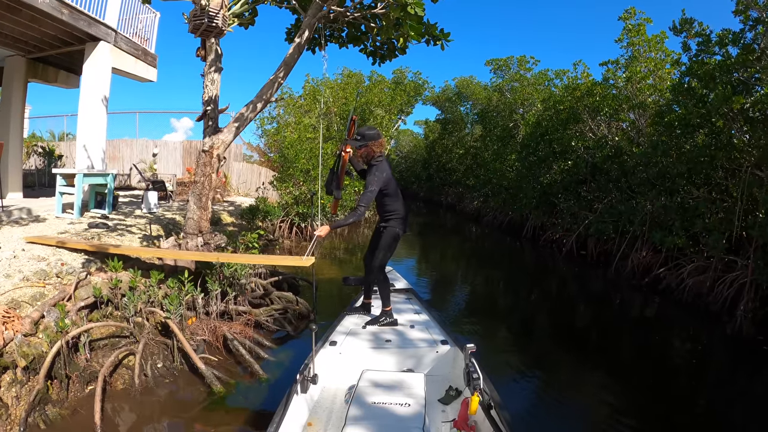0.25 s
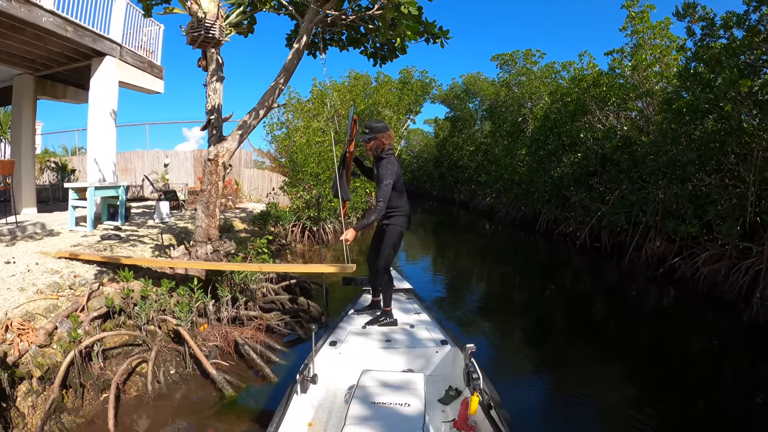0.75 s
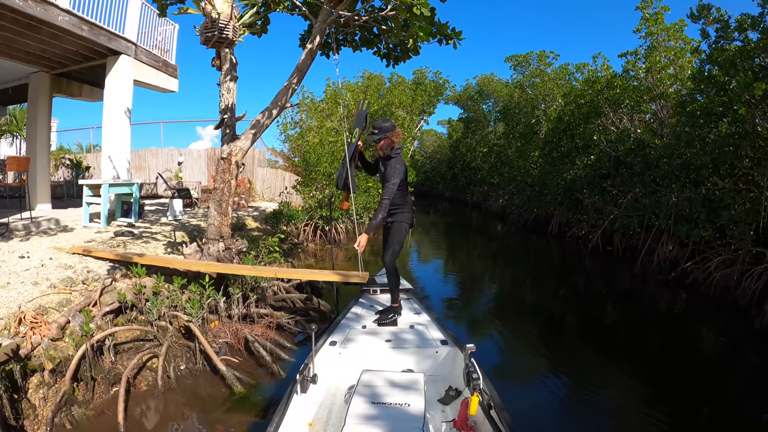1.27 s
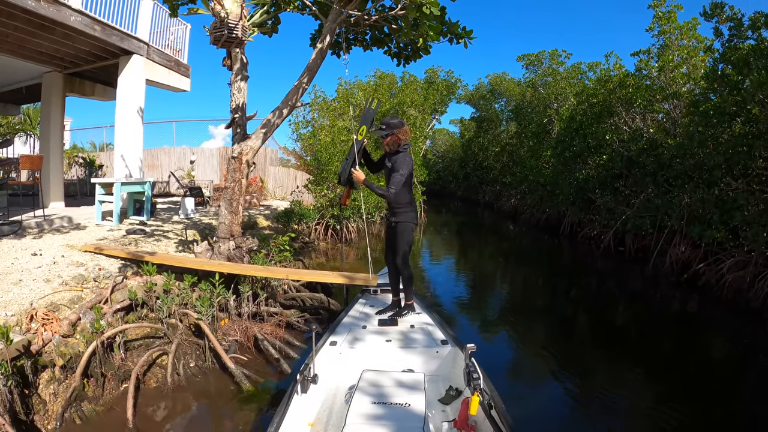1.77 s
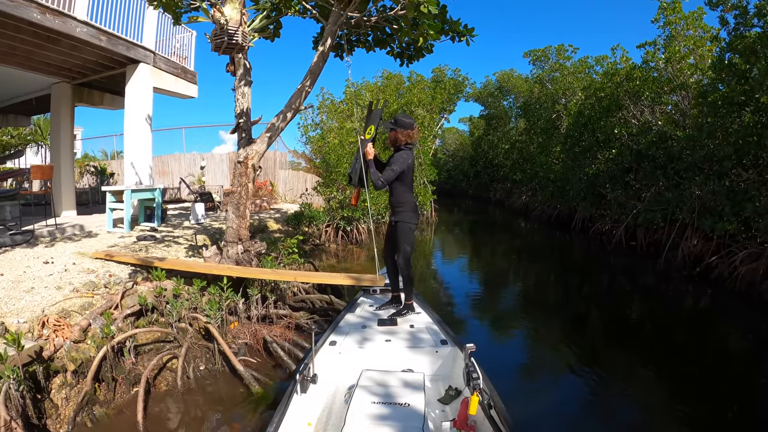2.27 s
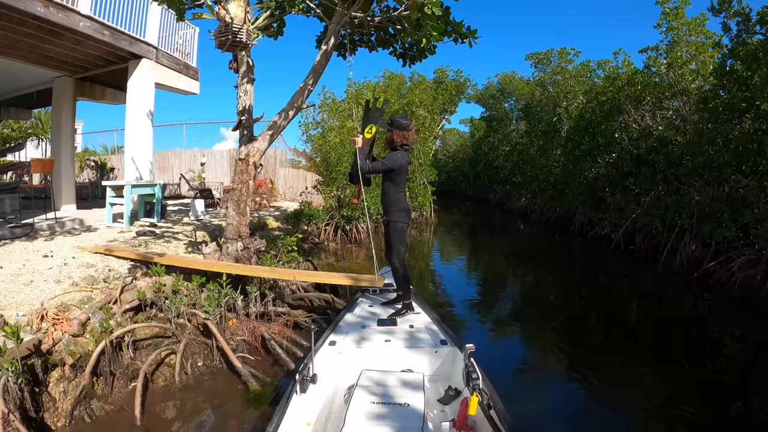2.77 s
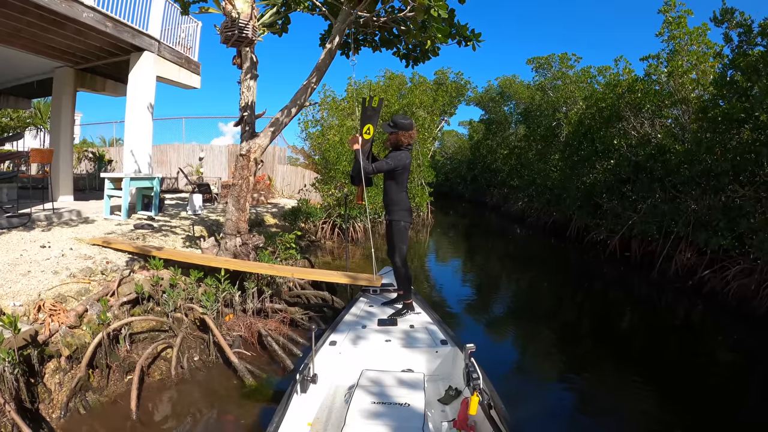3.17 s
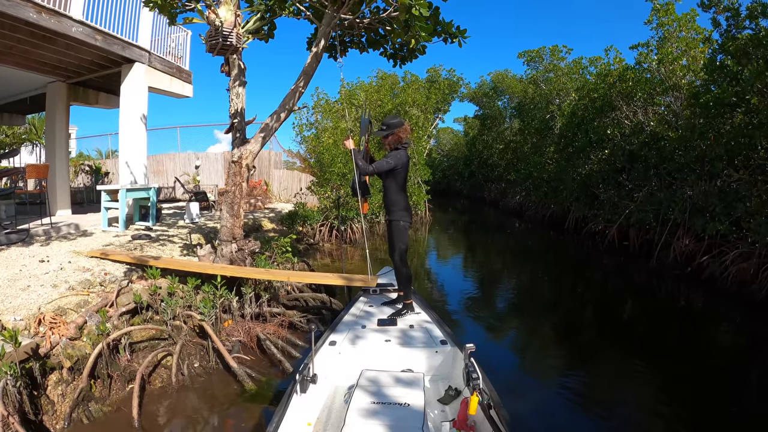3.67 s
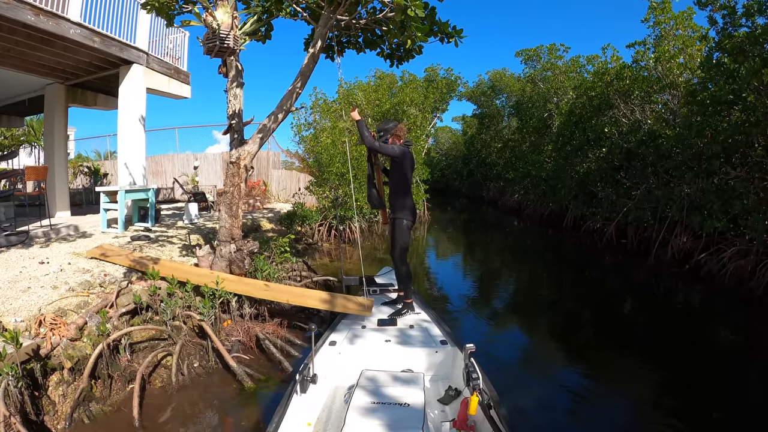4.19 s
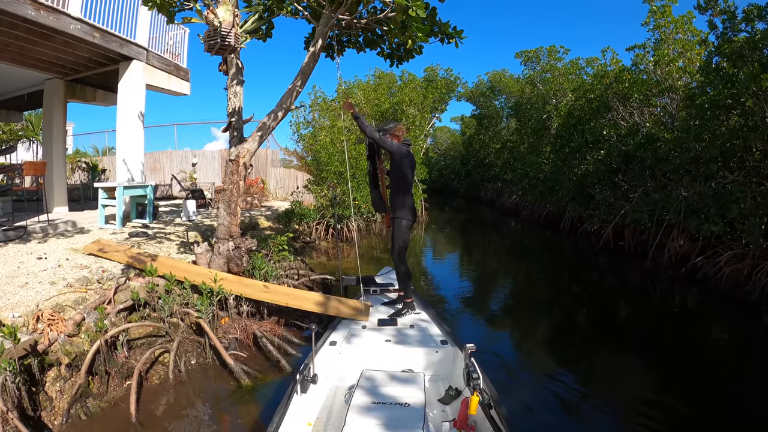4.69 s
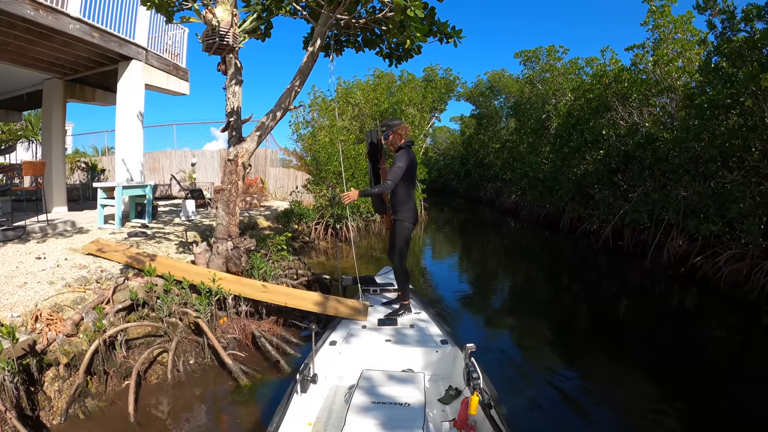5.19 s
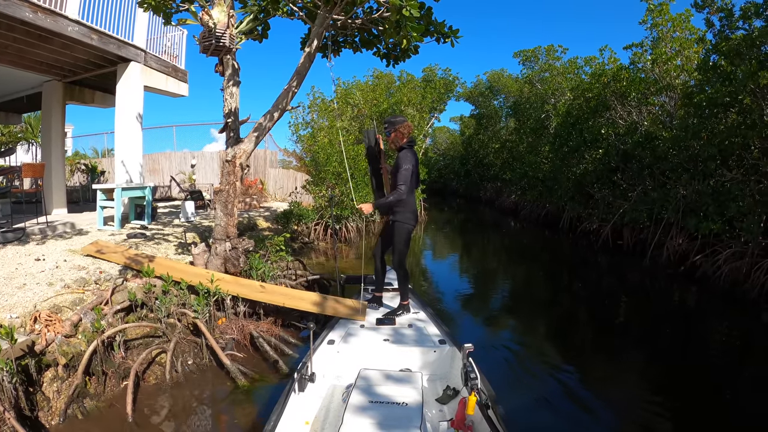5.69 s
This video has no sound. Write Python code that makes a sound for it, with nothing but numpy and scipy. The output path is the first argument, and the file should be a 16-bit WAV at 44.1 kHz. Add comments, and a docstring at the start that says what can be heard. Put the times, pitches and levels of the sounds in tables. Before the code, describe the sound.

Jerky wooden scraping gives way to knocks, ticking gear and booming thumps on a small boat's hollow hull, with faint rustling.

```python
"""Boarding plank on a small boat

A person handles a boarding plank on a hollow boat by a canal bank, heard from the hull.
A wooden plank scrapes over an edge in stick-slip jerks, and later the wood knocks. Feet and plank thump
the deck and set the hull booming. Gear ticks, cloth and line rustle, and a lumpy low rumble runs below."""
import sys
import numpy as np
from scipy import signal
from scipy.io import wavfile

SR = 44100
rng = np.random.default_rng(int(sys.argv[2]) if len(sys.argv) > 2 else 0)


def pcm_store(signal):
    """Save signal as 16-bit PCM."""
    levels = np.round(np.clip(np.atleast_2d(signal), -1, 1) * 32767)
    wavfile.write(sys.argv[1], SR, levels.astype(np.int16).T)


N = 261954


def plank_scrape():
    """Stick-slip clicks ring the wood's modes and throw off grit; catches and a knock strike them hard."""
    # pressure of the stroke over the edge: t/s, level/dB
    scrape = [(0.0, -39), (0.1, -64), (0.22, -40), (0.53, -31.5), (0.64, -36), (0.73, -49.5), (0.79, -45.5),
              (1.0, -50), (1.12, -77)]
    # sharp catches during the drag: t/s, level/dB, treble tilt/(dB/octave)
    catches = [(0.153, -35, -5), (0.212, -36.5, 6.5), (0.221, -26, 1.5), (0.236, -16.5, -1.5),
               (0.274, -22, -1.5), (0.332, -31, 3), (0.362, -16.5, -1), (0.384, -15, 0.5),
               (0.403, -19, -4.5), (0.483, -37, 3), (0.5, -36, -1), (0.564, -22, -4.5), (0.588, -13, -0.5),
               (0.636, -26, -6), (0.793, -27.5, -0.5), (0.807, -18, -3.5), (0.914, -41, 2.5)]
    # the later wooden knock: t/s, level/dB, treble tilt/(dB/octave)
    drop = [(2.107, -27, 0)]
    # the wood's modes: f/Hz, knocked level/dB, dragged level/dB
    modes = [(139.5, -12, -20), (228.4, -4, -23), (384, -3.5, -12.5), (433.7, -9.5, -6.5), (536, -9, -6),
             (574.4, 1.5, -17.5), (594, -41, -5), (670, -22, -4), (735, -14, -11), (763, -7, -17),
             (866, -15, -8.5), (933, -19, -8.5), (1031, -11, -6), (1256, -25, -16.5), (1370, -9.5, -20.5),
             (1479, -29, -9.5), (1735, -13.5, -2.5), (1942, -15.5, -7.5), (3235, -28, -13)]
    # spectrum of the grit: f/Hz, level/dB
    grit_spectrum = [(250, -7.5), (430, -16.5), (1000, 0), (3300, -11), (9600, -40.5), (14500, -46.5)]
    _, catch_db, catch_tilt_db = np.transpose(catches)
    jerky = from_db(1.5 * drift(35))
    drag = from_db(in_time(scrape)[0]) * jerky * (np.arange(N) < scrape[-1][0] * SR)
    stroke = drag + bursts(catches, from_db(catch_db - 6), t60=0.064)
    slips = grains(per_s=450, spread_db=4.5) * stroke
    body = sum(from_db(db) * ring(slips[k % 2, k // 2 % 2], hz, decay_s(hz, 0.16))
               for k, (hz, _, db) in enumerate(modes))
    body += from_db(-4.5) * ring(slips[0, 0], hz=105, t60=0.064)   # the hull groans along
    bright_db = bursts(catches, catch_tilt_db, t60=0.18)
    grit = stroke * coloured(grains(per_s=1800, spread_db=1.3), grit_spectrum, low_hz=260, bands=12,
                             patchy_db=1, flicker_hz=29.2, tilt_db=bright_db)
    knocked, dragged = np.array(modes)[:, :2], np.array(modes)[:, ::2]
    knocks = strike(drop, knocked, gain_db=-3.5, uneven_db=2, travel_s=0.0048, t60=0.32)
    knocks += strike(catches, dragged, gain_db=-10, uneven_db=5, travel_s=0.002, t60=0.12)
    pan_left = from_db([[1.2], [-1.2]])
    return (from_db(-19) * body + knocks + from_db(-8) * grit) * pan_left


def deck_thumps():
    """The hull booms, pushed down first, and loose boards and gear shake briefly after each thump."""
    # feet, weight and the plank's end landing: t/s, level/dB, treble tilt/(dB/octave)
    thumps = [(2.315, -42, 17), (2.551, -40.5, -12), (2.811, -33, 10.5), (3.193, -33, 0),
              (4.056, -26.5, 5.5), (4.499, -8, 0), (4.595, -10.5, 0), (4.605, -32, 13), (4.652, -22, -6.5),
              (4.746, -28, 4), (5.426, -26, -1.5), (5.525, -49, 14)]
    # modes of the hollow hull: f/Hz, level/dB
    hull_modes = [(59, -4.5), (85, -7.5), (118, -5.5), (175, -3.5), (235, -14), (310, -17), (400, -18.5),
                  (458, -14), (680, -31.5)]
    boom = -strike(thumps, hull_modes, gain_db=-13, uneven_db=1.8, travel_s=0.00125, t60=0.2,
                   loss=0.42, lean_db=.7, dispersion=1, swell=.02)
    contacts = grains(per_s=1500, spread_db=2.5)[0, 0]
    rattle = rms_one(signal.sosfilt(signal.butter(2, [400, 1200], "band", fs=SR, output="sos"), contacts))
    shake = bursts(thumps, from_db(np.array(thumps)[:, 1] - 39), t60=0.17)
    return boom + rattle * shake


def gear_taps():
    """Each tap is a crack, a very short tone and a gritty rattle dying away around that pitch."""
    # small ticks and taps: t/s, level/dB, f/Hz, rattle t60/s
    taps = [(1.178, -51, 4540, 0.039), (1.221, -46, 1690, 0.095), (1.274, -50, 2830, 0.044),
            (1.577, -41, 1630, 0.07), (1.697, -47, 2700, 0.0077), (1.7404, -47, 920, 0.17),
            (2.106, -29.5, 1200, 0.16), (2.1835, -37, 2650, 0.22), (2.2018, -32.5, 1540, 0.23),
            (2.2518, -31.5, 2700, 0.03), (2.316, -35, 1500, 0.23), (2.383, -39, 3120, 0.06),
            (2.4583, -33, 1560, 0.067), (2.8136, -44, 3010, 0.12), (3.759, -53.5, 1620, 0.099),
            (3.956, -42.5, 2980, 0.043), (4.331, -47.5, 1730, 0.071), (4.497, -28, 1007, 0.097),
            (4.591, -39.5, 1020, 0.068), (5.413, -55, 1296, 0.05), (5.427, -34, 1796, 0.085),
            (5.6352, -56, 2060, 0.12), (5.728, -56.5, 1650, 0.47), (5.877, -59, 1300, 0.12),
            (5.9054, -28.5, 2400, 0.084)]
    size = 8192
    out, t = np.zeros((2, N + size)), np.arange(size) / SR
    attack = np.minimum(t / .0008, 1)
    crack_lowpass = signal.butter(2, 9000, fs=SR, output="sos")
    rattle_lowpass = signal.butter(2, 7000, fs=SR, output="sos")
    for s, level_db, hz, t60 in taps:
        grit = rng.standard_normal((2, size)) * from_db(4 * rng.standard_normal(size))
        grit = grit[0] + .2 * grit[1] * [[1], [-1]]   # narrow stereo
        band = signal.butter(1, [hz * 0.43, min(hz * 2.26, .4 * SR)], "band", fs=SR, output="sos")
        rattle = rms_one(signal.sosfilt(np.vstack([band, band, rattle_lowpass]), grit))
        rattle *= from_db(-9.5 - 60 * t / t60)
        crack = rms_one(signal.sosfilt(crack_lowpass, grit)) * from_db(-19 - 60 * t / .015)
        tone = np.sin(2 * np.pi * hz * t) * from_db(-6 - 60 * t / .03)
        at = round(s * SR)
        out[:, at:at + size] += from_db(level_db) * (rattle + crack + tone) * attack
    return out[:, :N]


def rustle():
    """Cloth rubs in fine grains and line rasps over an edge; moves swell and fade over a faint hiss."""
    # moves of cloth and line: t/s at full level, hold/s, level/dB, treble tilt/(dB/octave)
    moves = [(1.009, 0.02, -62, 2), (1.176, 0.17, -71, 2.5), (1.454, 0.051, -66.5, 5.5),
             (1.537, 0.058, -67, 0.5), (1.73, 0.034, -68, 0), (2.168, 0.31, -64.5, 2),
             (2.75, 0.078, -70, 3.5), (2.959, 0.064, -73.5, 5.5), (3.458, 0.19, -74.5, 2),
             (3.815, .05, -71.5, 1), (3.892, 0.076, -60, 1), (4.066, 0.066, -62.5, 1.8),
             (4.147, 0.47, -63.5, 0.5), (5.16, 0.21, -74, 0.5), (5.459, 0.015, -68, 2),
             (5.788, 0.014, -62.5, 2), (5.91, .04, -56.5, 1)]
    # spectrum of rubbing cloth: f/Hz, level/dB
    cloth_spectrum = [(300, 7), (1000, -7.5), (2000, -2.5), (5500, -13), (9000, -23), (14500, -37.5)]
    # resonances of the rasping line: f/Hz, level/dB
    rasp_modes = [(740, 3), (1080, 7), (1350, 3), (3400, 4)]
    rise_db_per_s, fall_db_per_s = 193, 156
    hiss_db, hiss_tilt_db = -79.5, 3
    t = np.arange(0, N + 64, 64) / SR
    s, hold, level_db, tilt_db = np.transpose(moves)[:, :, None]
    shape_db = -rise_db_per_s * np.maximum(s - t, 0) - fall_db_per_s * np.maximum(t - s - hold, 0)
    power, hiss = from_db(2 * (level_db + shape_db)), from_db(2 * hiss_db)
    total = power.sum(0) + hiss
    mean_tilt_db = ((power * tilt_db).sum(0) + hiss * hiss_tilt_db) / total   # loud moves set the colour
    level, colour_db = in_time(np.c_[t, np.sqrt(total), mean_tilt_db])
    cloth = coloured(grains(per_s=6000, spread_db=2.5), cloth_spectrum, low_hz=300, bands=11,
                     patchy_db=1.2, flicker_hz=10, tilt_db=colour_db, focus=.78)
    slips = grains(per_s=2500, spread_db=2.4)[0]
    rasp = rms_one(sum(from_db(db + 4.8 * drift(7.2)) * ring(slips, hz, t60=19 / hz)
                       for hz, db in rasp_modes))
    rasp = rasp[0] + .4 * rasp[1] * [[1], [-1]]   # mid and side
    return level * (cloth + from_db(1 - 1.5 * colour_db) * rasp)   # duller moves rasp more


def rumble():
    """Water and small shifts of weight shake the hull with a low, lumpy noise."""
    # strength of the shaking: t/s, level/dB
    envelope = [(0.0, -42.5), (1.1, -49), (1.9, -45), (3.3, -48.5), (3.7, -48), (4.1, -47), (5.0, -49),
                (5.5, -49.5), (5.94, -46.5)]
    # spectrum of the shaking hull: f/Hz, level/dB
    hull_spectrum = [(30, 11.5), (48, -6), (100, -4.5), (172, -9), (250, -27), (600, -36.5)]
    shaking = coloured(rng.standard_normal((2, 2, N)), hull_spectrum, low_hz=28.4, bands=9,
                       patchy_db=3.5, flicker_hz=24.7, focus=.78)
    return from_db(in_time(envelope)[0]) * shaking


def bank_echoes(x):
    """Bank and trees return ten dull echoes, five to each side, the later ones fainter."""
    dull, out = signal.lfilter([.3], [1, -.7], x.mean(0)), np.zeros((2, N))
    for k, lag in enumerate((rng.uniform(0.0094, 0.16, 10) * SR).astype(int)):
        out[k % 2, lag:] += dull[:-lag] * from_db(-300 * lag / SR) * (-1) ** (k // 2)
    return out


def strike(blows, modes, gain_db, uneven_db, travel_s, t60, loss=.84, lean_db=2.2, dispersion=.5,
           swell=.09):
    """Each blow rings every mode, leaning left or right; low bending waves arrive later."""
    s, level_db, tilt_db = np.transpose(blows)
    chance, out = rng.standard_normal((len(s), len(modes), 2)), np.zeros((2, N))
    for k, (hz, mode_db) in enumerate(modes):
        force, ring_s = np.zeros((2, N)), decay_s(hz, t60, loss)
        arrival = ((s + travel_s * (200 / hz) ** dispersion) * SR).astype(int)
        size_db = level_db + mode_db + gain_db + tilt_db * np.log2(hz / 200) + uneven_db * chance[:, k, 0]
        force[:, arrival] = from_db(size_db + lean_db / 2 * chance[:, k, 1] * [[1], [-1]])
        for share, detune in ((.7, -.007), (.5, .007)):   # a close pair that beats
            out += share * ring(force, hz * (1 + detune), ring_s)
        out -= ring(force, hz, swell * ring_s)   # the mode builds up in this share of its decay time
    out *= from_db(1.8 * drift(40))   # the ring shudders
    soft_contact = signal.butter(2, 3 * modes[-1][0], fs=SR, output="sos")
    return signal.sosfilt(soft_contact, out)


def coloured(source, spectrum, low_hz, bands, patchy_db, flicker_hz, tilt_db=0, focus=1):
    """Flickering half-octave bands, tilted by tilt_db an octave about 1 kHz; less focus is wider."""
    # stereo image, widest in the treble: f/Hz, left-right correlation
    likeness = [(60, .88), (400, .93), (3000, .9), (8000, .4), (13000, 0.0)]
    out, power, together = 0, 0, drift(flicker_hz / 2)
    edges = low_hz * 2 ** (np.arange(bands + 1) / 2)
    for k, (low, high) in enumerate(zip(edges, edges[1:])):
        bandpass = signal.butter(2, [low, high], "band", fs=SR, output="sos")
        mid, side = signal.sosfilt(bandpass, source[k % 2])
        hz = np.sqrt(low * high)
        alike = np.clip(focus * at_hz(likeness, hz), 0, 1)
        stereo = np.sqrt(1 + alike) * mid + np.sqrt(1 - alike) * side * [[1], [-1]]
        band = from_db(at_hz(spectrum, hz)) * stereo
        power += np.mean(band ** 2)
        flicker_db = patchy_db * (0.34 * together + drift(flicker_hz))
        out = out + band * from_db(tilt_db * np.log2(hz / 1000) + flicker_db)
    return out / np.sqrt(power)


def ring(force, hz, t60):
    """One damped mode: a unit click sets a sine of height 1 ringing."""
    r, w = from_db(-60 / (t60 * SR)), 2 * np.pi * hz / SR
    return signal.lfilter([0, np.sin(w)], [1, -2 * r * np.cos(w), r * r], force + 1e-18)


def decay_s(hz, t60_at_500, loss=0.85):
    """Higher modes lose their energy sooner."""
    return t60_at_500 * (500 / hz) ** loss


def grains(per_s, spread_db):
    """Two unrelated pairs of random click trains of uneven size."""
    sizes = from_db(spread_db * np.minimum(rng.exponential(1, (2, 2, N)), 5))
    signs = rng.choice([-1, 1], (2, 2, N))
    return sizes * signs * (rng.random((2, 2, N)) < per_s / SR)


def bursts(blows, heights, t60):
    """An envelope that rises within a few ms at each blow and dies away."""
    marks = np.zeros(N)
    marks[(np.array(blows)[:, 0] * SR).astype(int)] = heights
    rise = np.exp(-1 / (.002 * SR))
    dying = signal.lfilter([1], [1, -from_db(-60 / (t60 * SR))], marks + 1e-18)
    return signal.lfilter([1 - rise], [1, -rise], dying)


def drift(hz):
    """A smooth random wobble of rms 1, mostly slower than hz."""
    r = np.exp(-80 * np.pi * hz / SR)
    slow = signal.lfilter([1], [1, -2 * r, r * r], rng.standard_normal(N // 40 + 2002))[2000:]
    return np.interp(np.arange(N) / 40, np.arange(len(slow)), rms_one(slow))


def in_time(rows):
    """Columns of a curve at every sample."""
    s, *columns = np.transpose(rows)
    return [np.interp(np.arange(N) / SR, s, c) for c in columns]


def at_hz(points, hz):
    """Read a spectrum on a log frequency axis."""
    freqs, values = np.transpose(points)
    return np.interp(np.log(hz), np.log(freqs), values)


def from_db(db):
    """Decibels to gain."""
    return 10 ** (np.asarray(db) / 20)


def rms_one(x):
    """Scale to rms 1."""
    return x / np.sqrt(np.mean(x ** 2) + 1e-20)


def scene():
    """Scrapes and hits with faint echoes, over rustle and rumble; the left side is one sample late."""
    near = plank_scrape() + gear_taps() + deck_thumps()
    echoes = from_db(-24) * bank_echoes(near)
    left, right = near + echoes + rustle() + rumble()
    return np.array([np.r_[0, left[:-1]], right])


def record(dry):
    """The microphone housing lifts three bands; the deepest bass and the top are cut."""
    # housing resonances: f/Hz, width/Hz, lift/dB
    resonances = [(1200, 450, 6), (3400, 600, 3), (9000, 2000, 4)]
    for hz, width_hz, lift_db in resonances:
        dry = dry + (from_db(lift_db) - 1) * signal.lfilter(*signal.iirpeak(hz, hz / width_hz, SR), dry)
    low_cut = signal.sosfilt(signal.butter(6, 41, "high", fs=SR, output="sos"), dry)
    return signal.sosfilt(signal.cheby2(12, 60, 14800, fs=SR, output="sos"), low_cut)


dry = scene()
out = record(dry)
pcm_store(out)
```